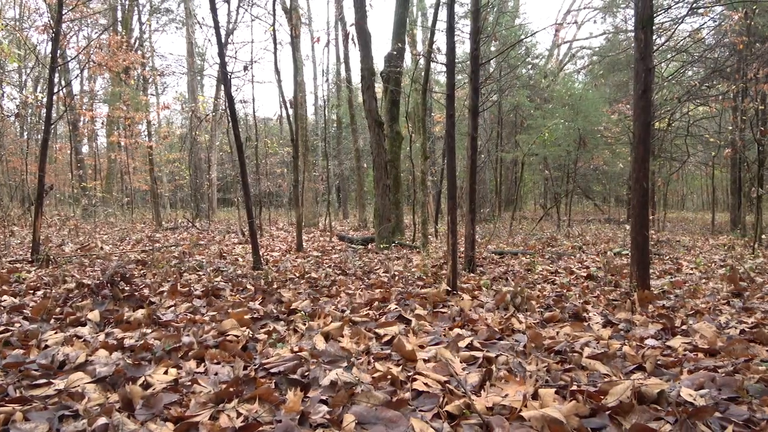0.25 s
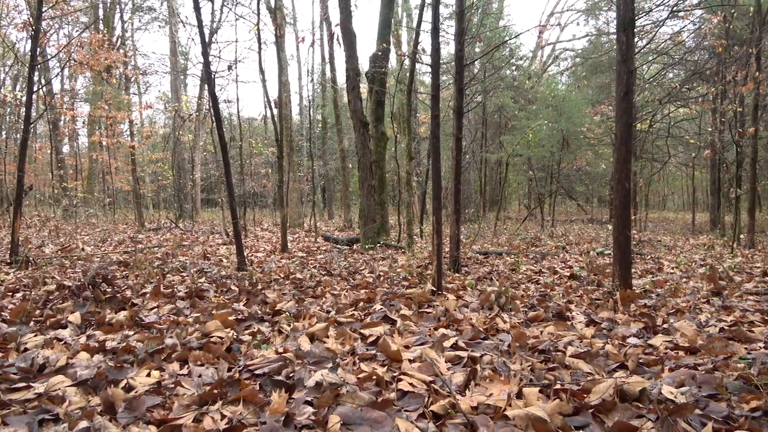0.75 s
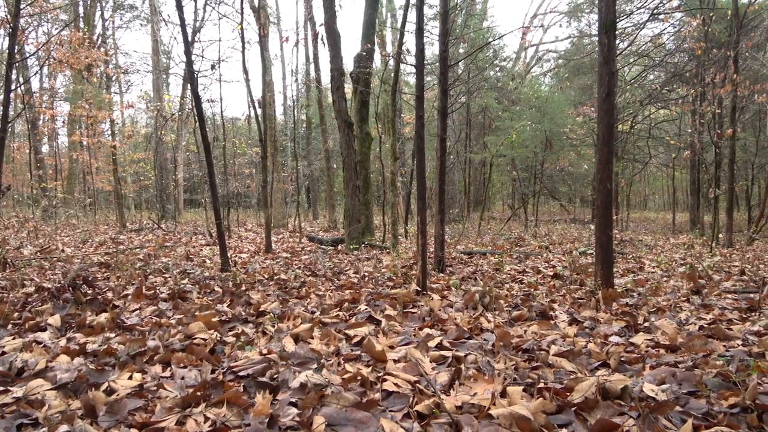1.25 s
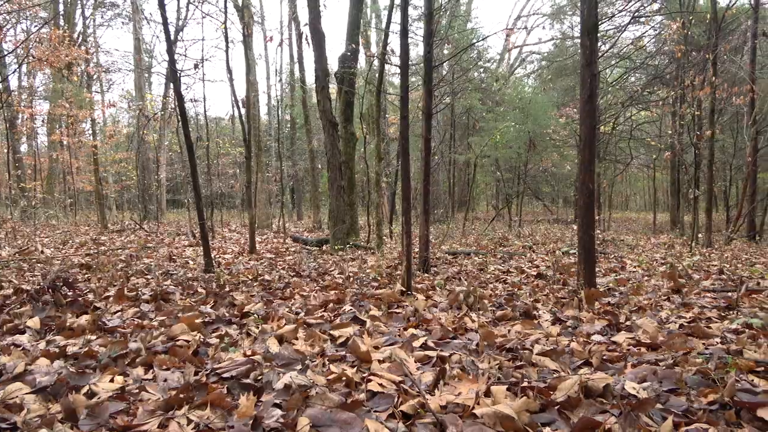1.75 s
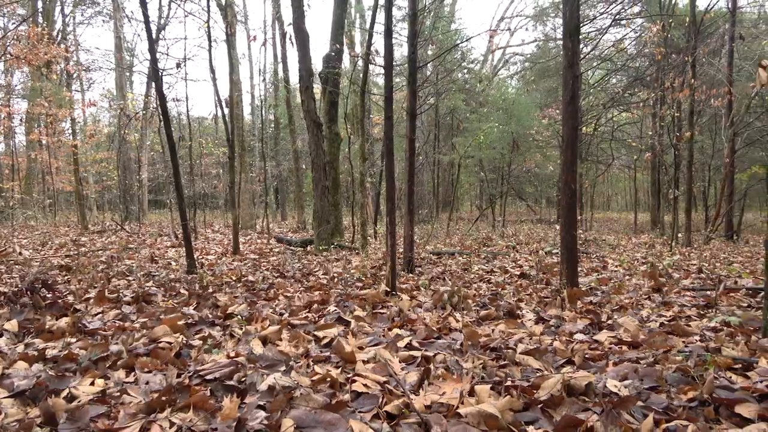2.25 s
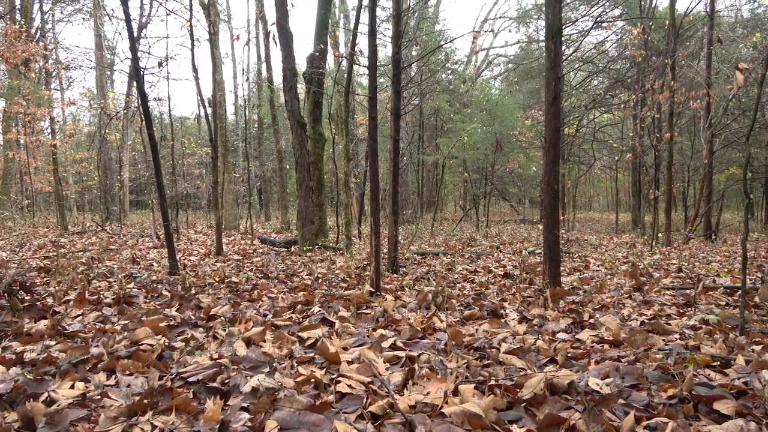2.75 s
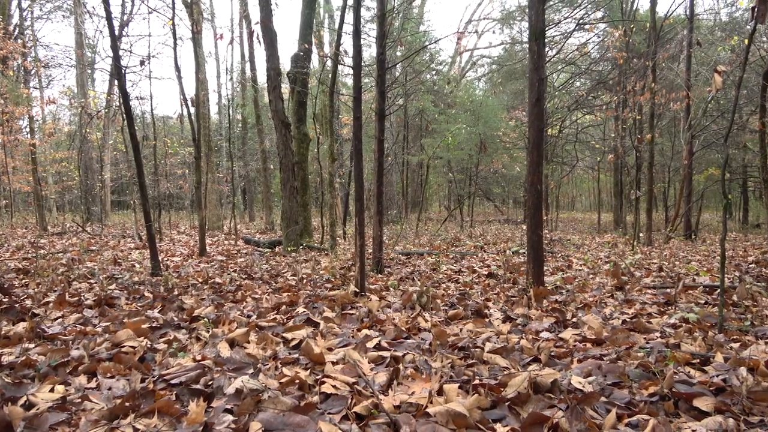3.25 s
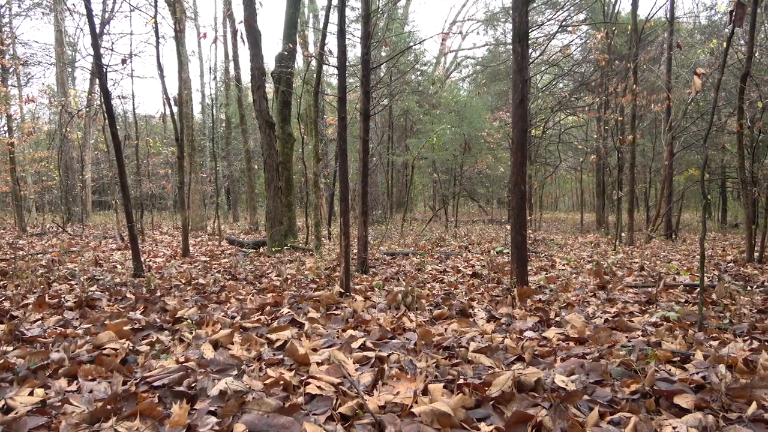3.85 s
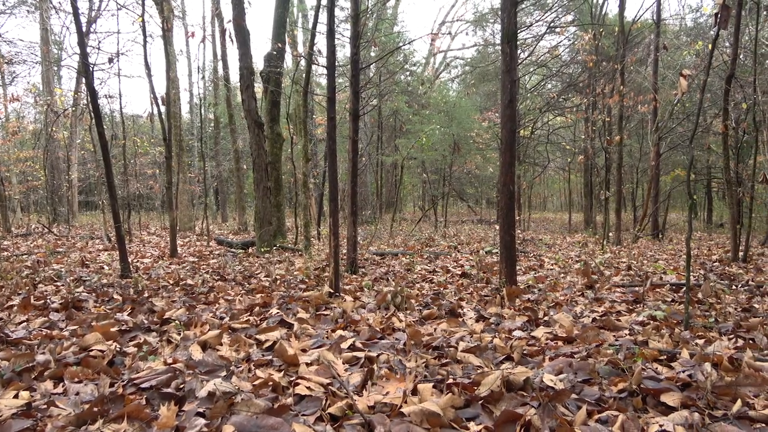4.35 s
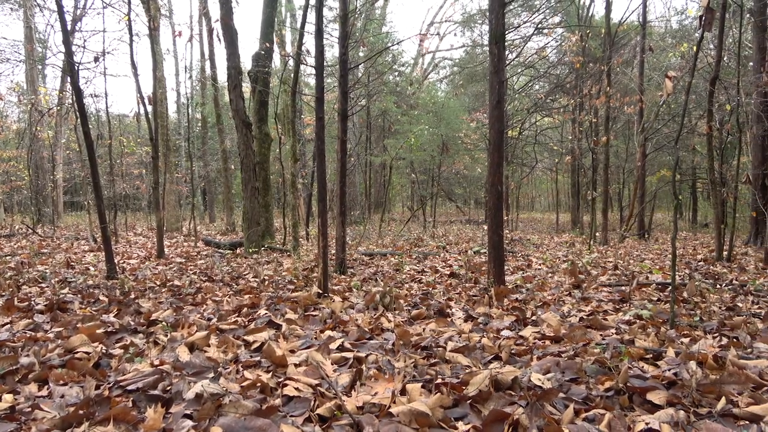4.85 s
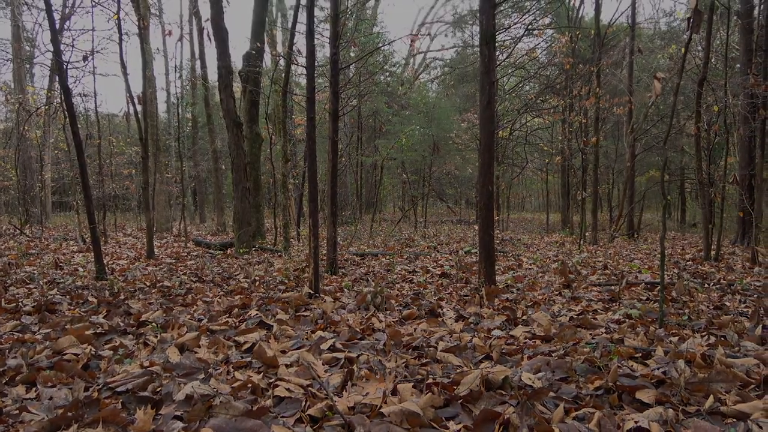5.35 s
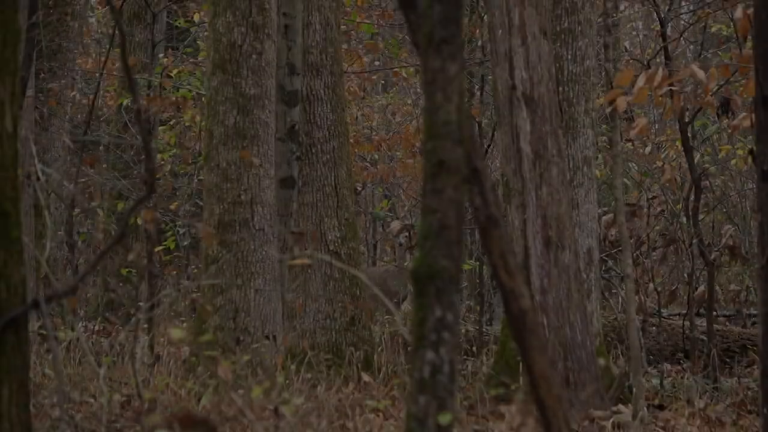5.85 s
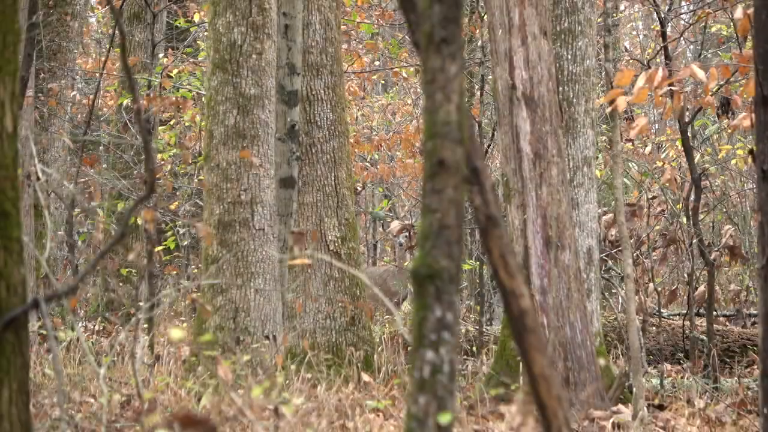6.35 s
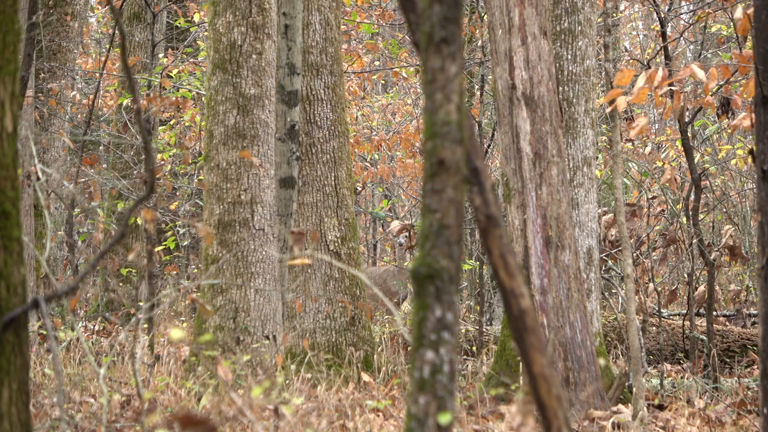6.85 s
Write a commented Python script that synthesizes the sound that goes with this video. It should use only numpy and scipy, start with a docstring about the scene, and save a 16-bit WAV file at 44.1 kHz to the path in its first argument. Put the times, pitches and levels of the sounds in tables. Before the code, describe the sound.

In a still wood, far traffic rumbles under a faint hiss while small birds give thin, scattered chirps. A squirrel clucks three times, and just before the third cluck one sharp click sounds right at the microphone. A few faint ticks follow as bits drop on dry leaves. The squirrel clucks three more times, and near the end a distant hawk screams once, hoarsely.

```python
"""A still autumn wood: far traffic rumbles and drones under a faint hiss, and from the start small
birds whistle thin chirps, many of them falling, that scatter among the trunks. A squirrel gives three
raspy clucks, and at 1.4 s, before the last of them, one sharp click sounds right at the microphone.
A few faint ticks follow as bits drop on dry leaves, and the squirrel clucks three times more.
Near the end a hawk screams once, hoarse and far off."""
import sys
import numpy as np
from scipy import signal
from scipy.fft import rfft, irfft
from scipy.io import wavfile
from scipy.ndimage import uniform_filter1d

SR = 44100
rng = np.random.default_rng(int(sys.argv[2]) if len(sys.argv) > 2 else 0)


def store_pcm(level_fs):
    """Save levels as 16-bit WAV."""
    pcm = np.round(np.clip(level_fs, -1, 1) * 32767).astype(np.int16)
    wavfile.write(sys.argv[1], SR, np.atleast_2d(pcm).T)


N = 313992
TIME = np.arange(N) / SR


def gain_of(db):
    """Decibels to gain."""
    return 10 ** (np.asarray(db) / 20)


def unit_rms(x):
    """Scales to rms 1."""
    return x / np.sqrt(np.mean(x ** 2) + 1e-20)


def read(points, hz):
    """Reads a table on a log-frequency axis."""
    f, value = np.transpose(points)
    return np.interp(np.log(hz + 1), np.log(f + 1), value)


def add(mix, s, sound):
    """Mixes a sound in at time s."""
    part = mix[max(round(s * SR), 0):][:len(sound)]
    part += sound[:len(part)]


def coloured(x, colour):
    """Filters by a table of (frequency [Hz], gain [dB])."""
    return irfft(rfft(x) * gain_of(read(colour, np.fft.rfftfreq(len(x), 1 / SR))), len(x))


def wander(rate_hz):
    """Smooth random drift of rms 1, as long as the scene."""
    hz = np.fft.rfftfreq(N, 1 / SR)
    return unit_rms(irfft(rfft(rng.standard_normal(N)) * np.exp(-(hz / rate_hz) ** 2), N))


def impulse(colour, size=2048):
    """The shortest causal pulse of a given colour, peak 1."""
    log_gain = np.log(gain_of(read(colour, abs(np.fft.fftfreq(size, 1 / SR)))))
    minimum_phase = np.exp(np.conj(signal.hilbert(log_gain)))
    pulse = np.fft.ifft(minimum_phase).real[:size // 2]
    return pulse / abs(pulse).max()


def trunks(x, echoes_per_s=1500, build_s=0.0032):
    """Many small echoes reach the microphone from the trunks around it; the treble dies first."""
    # decay of the wood: (frequency [Hz], time to fall 60 dB [s])
    decay_times = [(500, 0.98), (3000, 1.08), (7000, 0.82), (10000, 0.52), (14000, 0.18)]
    taps = rng.standard_normal(SR) * (rng.random(SR) < echoes_per_s / SR)
    taps *= 1 - np.exp(-TIME[:SR] / build_s)
    hz, t, spectra = signal.stft(taps, SR, nperseg=256)
    decay = gain_of(-60 * t / read(decay_times, hz)[:, None])
    tail = signal.istft(spectra * decay, SR)[1]
    return signal.fftconvolve(x, tail / np.linalg.norm(tail))[:N]


def air(trim_db=-0.93, patchy_db=0.83, shift_s=(5.7, 6.1), swell_half_s=0.19, swell_hz=3000, size=4096):
    """The bed of the wood: rumble and hiss, the wash of far tyres and brief swells of high hiss."""
    # the bed before and after its colour shifts: (frequency [Hz], level before trim [dB per Hz])
    early_colour = [(5, -74), (11, -66), (22, -59), (34, -71), (80, -59.5), (100, -64.5), (128, -64),
                    (200, -74), (290, -81), (400, -81), (720, -83.5), (1000, -86.5), (1400, -87),
                    (2600, -93), (3900, -91.5), (4650, -92), (7500, -99), (15500, -100)]
    late_colour = [(15, -86), (27, -76), (60, -60), (105, -59), (150, -70.5), (220, -75.5), (330, -80),
                   (520, -83.5), (1000, -86), (2600, -91.5), (3700, -86.5), (4600, -91), (7500, -99),
                   (15500, -100)]
    # a narrow rise in the hiss: (frequency [Hz], width [Hz], lift [dB])
    hiss_peak = (5285, 290, 5.3)
    # far tyres swell and ebb: (time [s], half length [s], frequency [Hz], lift [dB])
    tyres = [(0.25, 0.28, 745, 2), (2.28, 0.25, 660, 6.3), (4.6, 0.42, 664, 1.5), (5.703, 0.51, 374, 5.5)]
    # brief swells of high hiss, a faint raspy call at 0.85 s, then breeze: (time [s], lift [dB])
    hiss_swells = [(0.85, 3.3), (1.25, 2.5), (2.8, 1.5), (4.12, 4)]
    overlap = size * 3 // 4
    hz, t, spectra = signal.stft(rng.standard_normal(N), SR, nperseg=size, noverlap=overlap)
    hz = hz[:, None]
    late = np.interp(t, shift_s, (0, 1))
    bed_db = read(early_colour, hz) * (1 - late) + read(late_colour, hz) * late
    peak_hz, width_hz, lift_db = hiss_peak
    bed_db += lift_db * np.exp(-((hz - peak_hz) / width_hz) ** 2)
    for s, half_s, centre_hz, db in tyres + [(s, swell_half_s, swell_hz, db) for s, db in hiss_swells]:
        bed_db += db * np.exp(-((t - s) / half_s) ** 2 - (np.log((hz + 1) / centre_hz) / 0.49) ** 2)
    patches = uniform_filter1d(rng.standard_normal(spectra.shape), size=30, axis=0)
    patches = unit_rms(uniform_filter1d(patches, size=5, axis=1))  # bands drift in level
    bed_db += patchy_db * patches / (1 + (hz / 5000) ** 4)  # the top hiss is smooth
    bed = signal.istft(spectra * gain_of(bed_db + trim_db), SR, noverlap=overlap)[1]
    return bed[:N] * np.sqrt(SR / 2)


def engines(waver_hz=0.94, flutter=0.24, fade_s=0.29):
    """Far engine notes fade in, draw nearer or recede, and flutter on their way through the air."""
    # drones: (start [s], end [s], pitch [Hz], level halfway [dB], growth [dB per s])
    drones = [(-.1, 1.8, 84.87, -46.5, -1), (0.8, 5.5, 159.4, -51.5, .7), (2.75, 5.4, 120.3, -50, 1.5),
              (4.35, 5.9, 132, -49.5, -2), (5.36, 7.1, 101.9, -41, 4)]
    out = np.zeros(N)
    for start, end, hz, db, growth in drones:
        fade = np.clip(np.minimum(TIME - start, end - TIME) / fade_s, 0, 1)
        level = gain_of(db + growth * (TIME - (start + end) / 2)) * fade
        turns = np.cumsum(hz + waver_hz * wander(2.9)) / SR
        out += level * (1 + flutter * wander(4.9)) * np.sqrt(2) * np.sin(2 * np.pi * turns)
    return out


def leaves(wet_db=-8, crumple_db=-3, crackles_per_s=700, stir_per_s=14, stir_db=-53):
    """Bits drop on dry leaves with a tick and a short crumple; far fainter ones stir all the time."""
    # falling bits: (time [s], peak [dB], length of the crumple [s])
    ticks = [(1.96, -45.5, .02), (3.29, -47, .02), (3.598, -40.5, .02), (3.6692, -35.5, .002),
             (5.1472, -38, .004), (5.275, -38.5, .02), (5.352, -40.5, .04)]
    # ring of a dry leaf: (frequency [Hz], gain [dB])
    leaf_colour = [(300, -28), (1200, -7), (3400, 0), (4800, -9.5), (8000, -22), (15000, -30)]
    hits = gain_of(stir_db) * rng.standard_normal(N) * (rng.random(N) < stir_per_s / SR)
    for s, db, length in ticks:
        size = round(length * SR) + 1
        crumple = gain_of(crumple_db) * rng.standard_normal(size)
        crumple *= rng.random(size) < crackles_per_s / SR
        crumple[0] = 1  # the landing itself
        add(hits, s, gain_of(db) * crumple)
    out = signal.fftconvolve(hits, impulse(leaf_colour))[:N]
    return out + gain_of(wet_db) * trunks(out)


def bird_notes(slide_s=0.084, slide_bend=.9, sag=0.0156, chip_bend=0.62, chip_top=0.34, chip_wet_db=-10.5):
    """Slides, whistles and chips; yields (time [s], pitch curve [Hz], level [dB], echo share [dB])."""
    # thin falling calls, and a low falling note under the hawk's scream at 6.1 s: (time [s], length [s], top
    # pitch [Hz], end pitch [Hz], level [dB])
    slides = [(1.351, 0.066, 8000, 7350, -66), (2.28, .14, 8750, 8150, -65.5),
              (3.297, .075, 9400, 7200, -46.5), (3.513, .024, 7700, 7100, -55),
              (4.452, 0.13, 8750, 7170, -58.5), (5.064, .064, 8800, 7750, -61.5),
              (5.265, .035, 3150, 2750, -56), (5.558, 0.019, 8300, 6940, -54),
              (6.095, .075, 1320, 1110, -61)]
    # nearly level whistles further off: (time [s], length [s], pitch [Hz], level [dB])
    whistles = [(0.213, .04, 7300, -65), (0.62, .068, 6450, -66), (0.815, .015, 3900, -58),
                (2.435, .015, 2170, -57.5), (3.828, .19, 4330, -68), (3.914, .02, 2200, -58),
                (4.1, 0.11, 2230, -67), (4.799, 0.31, 2750, -72), (5.245, .03, 3200, -54),
                (5.335, .05, 2290, -57.5), (5.571, .024, 7090, -45), (6.281, 0.073, 1430, -67),
                (6.4, 0.09, 3650, -60), (6.887, .03, 7050, -58.5)]
    # arched chips of one bird close by: (time [s], length [s], top pitch [Hz], level [dB])
    chips = [(3.484, .028, 9850, -60), (3.655, .043, 6840, -43.5)]

    def progress(length):
        return np.linspace(0, 1, round(length * SR))

    def wet_db(db):
        return 3 + .15 * (-53 - db)  # fainter calls are further off and wetter

    for s, length, top_hz, end_hz, db in slides:
        # the top note is held until the slide, which takes at most slide_s
        slide = np.clip(1 - (1 - progress(length)) * max(length / slide_s, 1), 0, 1)
        yield s, top_hz + (end_hz - top_hz) * slide ** slide_bend, db, wet_db(db)
    for s, length, hz, db in whistles:
        yield s, hz * (1 - sag * (progress(length) - .5)), db, wet_db(db)
    for s, length, top_hz, db in chips:
        yield s, top_hz * (1 - chip_bend * (progress(length) - chip_top) ** 2), db, chip_wet_db


def birds(quaver=0.0155, quaver_at_hz=8000, overtone_db=-22, echo_stop_s=5.76):
    """Each note is a near-pure whistle that swells and fades, then scatters among the trunks."""
    direct, early, late = np.zeros((3, N))
    wobble = wander(255)
    for s, hz, db, wet_db in bird_notes():
        depth = quaver * hz / quaver_at_hz  # high notes quaver most
        hz = hz * (1 + depth * wobble[round(s * SR):][:len(hz)])
        phase = 2 * np.pi * np.cumsum(hz) / SR
        swell = np.sin(np.linspace(0, np.pi, len(hz)))
        tone = np.sin(phase) + gain_of(overtone_db) * np.sin(2 * phase)
        note = gain_of(db) * np.sqrt(2) * swell * tone
        add(direct, s, note)
        add(late if s > echo_stop_s else early, s, note * gain_of(wet_db))
    gate = np.clip((echo_stop_s - TIME) / .01, 0, 1)  # the echoes of the earlier notes stop short
    return direct + gate * trunks(early) + trunks(late)


def squirrel(rasp=.03, direct_db=-1.5, wet_db=-7.5):
    """A cluck is a raspy squeak whose harmonics arch and drop through the resonances of the muzzle."""
    # two runs of clucks: (time [s], relative level [dB], change over the cluck [dB])
    clucks = [(0.887, -49, -1), (1.199, -49.5, -3), (1.516, -51.5, -2.5), (4.373, -48, -11),
              (4.717, -48.5, -10), (5.08, -50.5, -10)]
    # arch of one cluck: (time [s], pitch [Hz])
    arch = [(0, 1250), (.012, 1400), (.022, 1540), (.034, 1230), (.062, 930)]
    # resonances of the muzzle: (frequency [Hz], gain [dB])
    muzzle = [(700, -29), (1150, -10), (1500, 0.5), (1950, -8), (2450, -2), (2850, -10), (3300, 3.5),
              (3650, -4), (4100, 1), (4700, -14), (7000, -35)]
    out, jitter = np.zeros(N), wander(460)
    t = np.arange(0, arch[-1][0], 1 / SR)
    pitch_hz = np.interp(t, *np.transpose(arch))
    for s, db, fading_db in clucks:
        push = signal.windows.tukey(len(t), .3) * gain_of(fading_db * t / t[-1])
        turns = np.cumsum(pitch_hz * (1 + rasp * jitter[round(s * SR):][:len(t)])) / SR
        voice = sum(np.sin(2 * np.pi * k * turns) for k in range(1, 4))
        add(out, s, gain_of(db) * unit_rms(coloured(voice, muzzle)) * push)
    return gain_of(direct_db) * out + gain_of(wet_db) * trunks(out)


def hawk(level_db=-45.5, rasp=.058, fundamental_db=-6, breath_db=-8.5, direct_db=-1, wet_db=-5):
    """A far, hoarse scream, strongest on its second harmonic, climbs ever faster and clears as it sags."""
    # resonances of the throat: (frequency [Hz], gain [dB])
    throat = [(900, -15), (1450, -12.5), (1800, -4), (2150, 1), (2450, -6.5), (2800, 1), (3150, -1.5),
              (3550, -2.5), (3750, -3), (4050, -2.5), (4450, -26), (7000, -47)]
    start_s, strongest_s, crest_s, end_s = 5.65, 5.95, 6.11, 6.317
    attack_s, release_s, taper_db_per_s = .035, .13, 11
    low_hz, top_hz, sag_hz_per_s = 1555, 1796, 550
    hoarse, clear, clear_after_s, clear_half_s = .77, .28, 0.057, .04  # roughness dips after the crest
    t = np.clip(TIME, start_s, end_s)
    age, past_crest = t - start_s, t - crest_s
    climb = np.minimum(age / (crest_s - start_s), 1) ** 2
    hz = low_hz + (top_hz - low_hz) * climb - sag_hz_per_s * np.maximum(past_crest, 0)
    rough = hoarse + (clear - hoarse) * np.exp(-((past_crest - clear_after_s) / clear_half_s) ** 2)
    envelope = np.minimum(age / attack_s, 1) * np.minimum((end_s - t) / release_s, 1)
    turns = np.cumsum(hz * (1 + rasp * rough * wander(302))) / SR
    tone = np.sin(2 * np.pi * 2 * turns) + gain_of(fundamental_db) * np.sin(2 * np.pi * turns)
    breath = unit_rms(coloured(rng.standard_normal(N), throat))
    voice = unit_rms(coloured(tone, throat)) * (1 - rough / 2) + gain_of(breath_db) * 2 * rough * breath
    call = gain_of(level_db - taper_db_per_s * abs(t - strongest_s)) * envelope * unit_rms(voice)
    return gain_of(direct_db) * call + gain_of(wet_db) * trunks(call)


def click(at_s=1.44795, peak_db=-3, wet_db=-36):
    """One dry snap at the microphone, a rattle of close reflections and a faint return from the ground."""
    # colour of the snap: (frequency [Hz], gain [dB])
    snap_colour = [(150, -49), (400, -25), (700, -15.5), (1700, -7.5), (3000, -6.5), (4100, 0), (5000, -6),
                   (6200, -19.5), (8300, -37), (10500, -27), (13000, -35), (16000, -40)]
    close, ground = (-15, 0.0011), (-18.5, .012)  # reflections: (level [dB], decay [s])
    snap, t = np.zeros(N), TIME[:SR // 10]
    add(snap, at_s, gain_of(peak_db) * impulse(snap_colour))
    out = snap + gain_of(wet_db) * trunks(snap)
    for db, decay_s in (close, ground):
        taps = rng.standard_normal(len(t)) * np.exp(-t / decay_s) * (t > .0006)
        out += gain_of(db) * signal.fftconvolve(snap, taps / np.linalg.norm(taps))[:N]
    return out


def scene():
    """Everything sits in the middle; only a faint hiss differs between left and right."""
    # hiss in the side channel: (frequency [Hz], level [dB per Hz])
    side_hiss = [(25, -100), (70, -110), (170, -117), (380, -104), (700, -107), (1500, -116), (4400, -116),
                 (7000, -107.5), (15000, -106)]
    mid = air() + engines() + birds() + squirrel() + hawk() + click() + leaves()
    side = coloured(rng.standard_normal(N), side_hiss) * np.sqrt(SR / 2)
    return np.array([mid + side, mid - side])


def record(dry):
    """The recorder cuts off the highest treble."""
    lowpass = signal.firwin(511, cutoff=15850, window=("kaiser", 9), fs=SR)
    return signal.oaconvolve(dry, lowpass[None], "same")


dry = scene()
out = record(dry)
store_pcm(out)
```